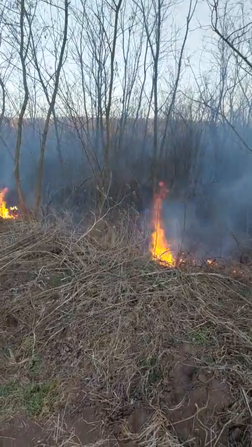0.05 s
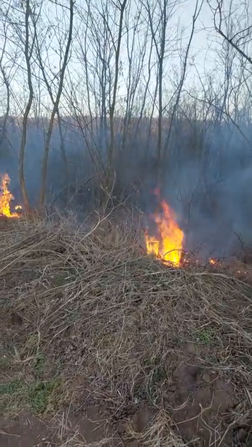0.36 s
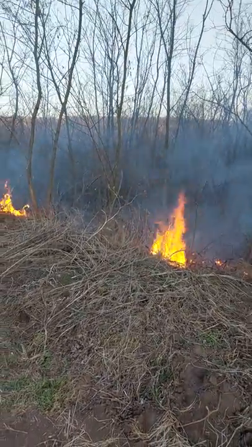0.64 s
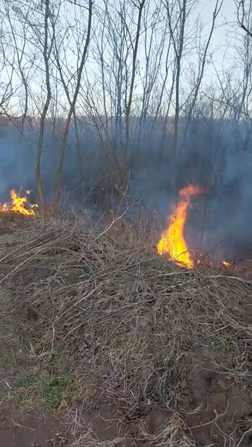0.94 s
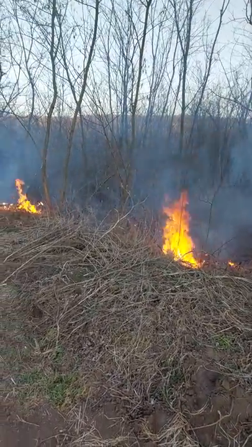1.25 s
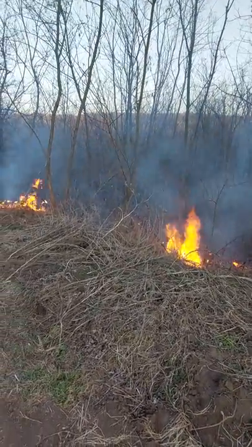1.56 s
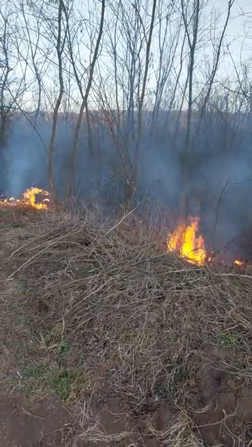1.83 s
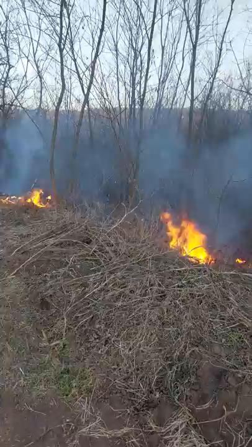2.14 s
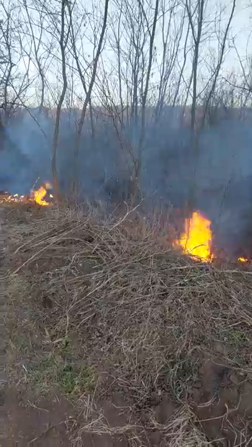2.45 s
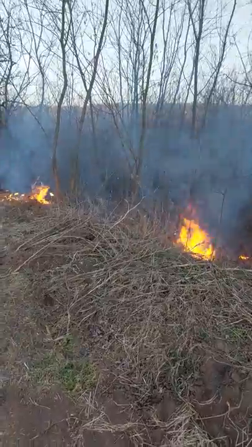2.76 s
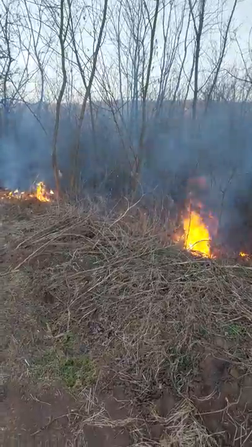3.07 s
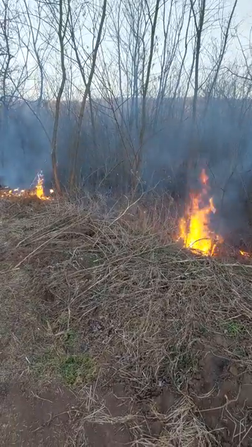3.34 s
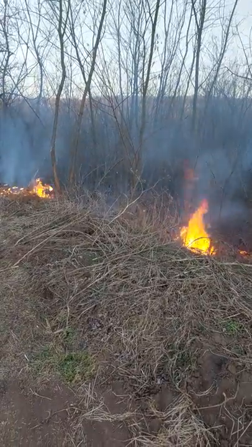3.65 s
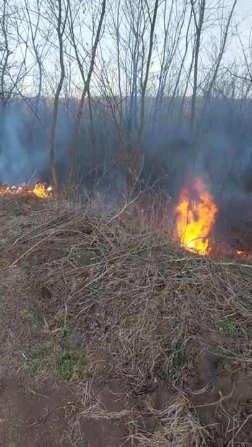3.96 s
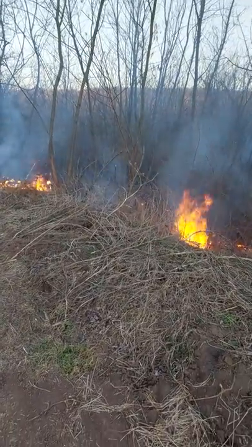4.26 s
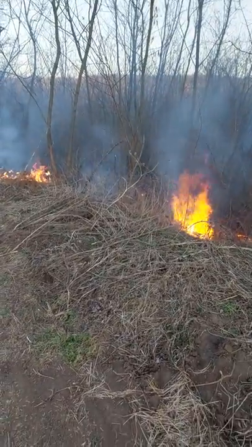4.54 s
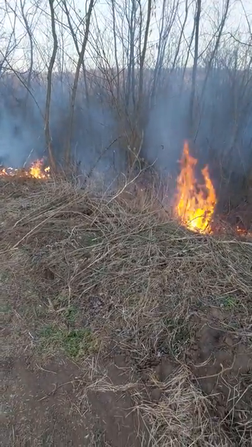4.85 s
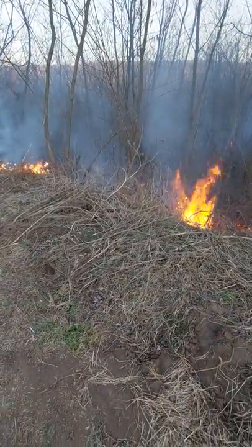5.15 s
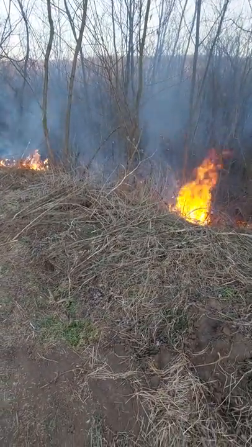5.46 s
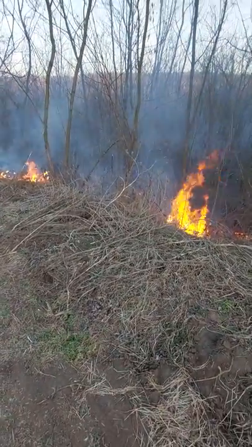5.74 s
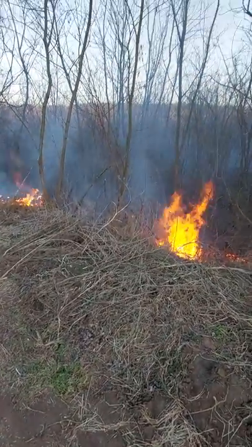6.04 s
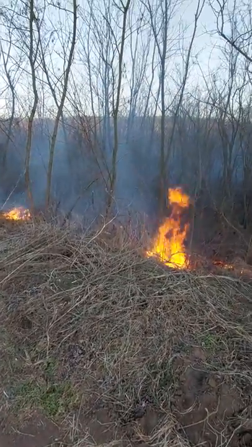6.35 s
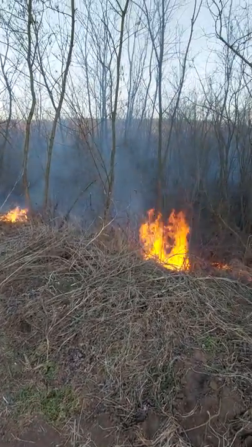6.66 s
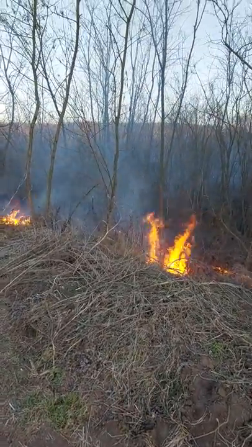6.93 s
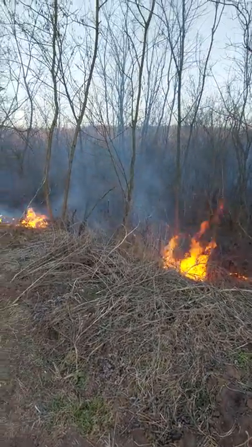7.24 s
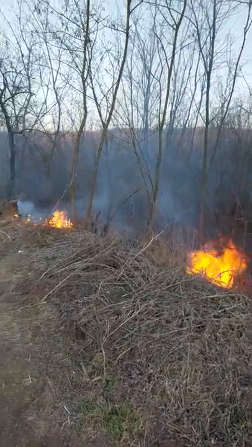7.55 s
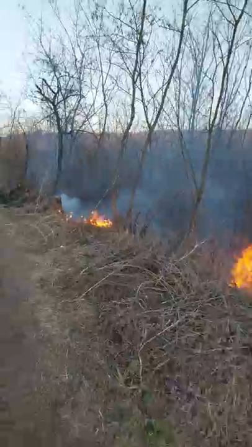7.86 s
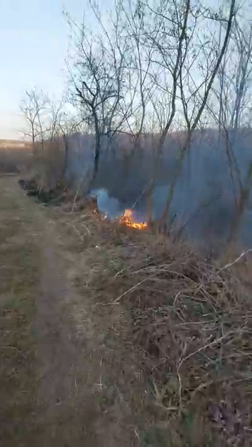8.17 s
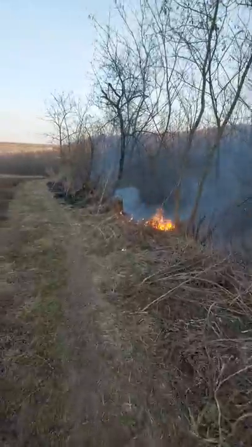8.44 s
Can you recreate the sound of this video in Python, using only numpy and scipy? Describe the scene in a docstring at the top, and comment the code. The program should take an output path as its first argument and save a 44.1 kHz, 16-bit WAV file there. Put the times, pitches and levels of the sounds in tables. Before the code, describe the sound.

Dry grass and brush burn at the edge of a wood. Sharp, irregular snaps of bursting stalks stand out from a fine, continuous crackle, while the flames rumble low and steady underneath. The snaps bunch up a little before the middle and again later, with faint short rushes as tufts catch. Past the middle, wind briefly thumps on the left side of the microphone.

```python
"""Sharp snaps over fine crackle and a low rumble: fire creeps through dry grass and brush by a wood.
Thick stalks burst and split, thin ones tick; brush and trunks scatter both. Countless tiny pops
form the bed, dry tufts flare in short rushes, and turbulent flames rumble. Steam whistles once
from a wet stem. For a moment, wind buffets the left microphone port."""
import sys
import numpy as np
from scipy import signal
from scipy.fft import rfft, irfft, next_fast_len
from scipy.io import wavfile
from scipy.ndimage import uniform_filter1d

SR = 44100
rng = np.random.default_rng(int(sys.argv[2]) if len(sys.argv) > 2 else 0)


def unload_audio(sound):
    """Save the sound as a 16-bit wav file, at the path given as the first command line argument."""
    columns = np.transpose(np.atleast_2d(sound))
    # keep every value between -1 and 1, then stretch to whole-number steps
    steps = np.round(np.clip(columns, -1, 1) * 32767)
    wavfile.write(sys.argv[1], SR, steps.astype(np.int16))


N = 383669
TIME = np.arange(N) / SR
LEFT_RIGHT = np.array([[1], [-1]])

# thick stalks bursting: t/s, level over 6 ms/dB, centre f/Hz, width/oct, woody knock/dB, L-R/dB
STALK_BURSTS = [(0.2427, -33.5, 10200, 1.95, -32, -1), (0.248, -36.5, 11900, 1.6, -30, 0.5),
                (0.3638, -40, 14600, 3, -3, -2), (0.449, -41.5, 9700, 2.8, -6, -2),
                (0.6722, -39.5, 7200, 1.9, 3, 1), (1.1084, -43, 1500, 6.6, -23, 0),
                (1.12, -30, 9500, 0.85, -17, 0), (1.283, -39, 14500, 1.2, -22, 0),
                (1.3892, -40.5, 8300, 4, -23, -1), (1.4551, -32.5, 3870, 2.2, -17, -1),
                (1.5944, -36.5, 11000, 1.7, -12, -1), (1.9228, -37.5, 14500, 2.3, -20, 0),
                (2.0196, -40.0, 6900, 4.4, -6, -2), (2.1478, -37.5, 14600, 2.7, -1, 0),
                (2.2208, -37, 14500, 1.2, -10, -1), (2.273, -41.5, 7500, 4.6, -16, -2),
                (2.6917, -32.5, 14600, 2.6, -2, -3), (2.6973, -42, 5600, 5.2, 0, 7),
                (2.739, -44, 4300, 2.3, -18, 1), (2.751, -38.5, 2270, 3.2, -24, 2),
                (2.886, -31, 14600, 1.6, -34, -3), (3.0286, -40, 8800, 2.4, -29, 1),
                (3.101, -41.5, 8150, 0.86, -7, -7), (3.2309, -38, 14600, 1.9, -30, -3),
                (3.3249, -32.5, 11400, 1.9, -5, -2), (3.355, -38.5, 6200, 4.1, 5, 1),
                (3.3696, -34, 8400, 2.7, -10, 0), (3.387, -37.5, 6100, 0.68, -6, -1),
                (3.4495, -35, 8000, 1.8, 1, -1), (3.547, -40.0, 4900, 3.4, 0, -2),
                (3.5556, -23.5, 14600, 3.1, -3, -1), (3.5837, -35, 7900, 2.5, -5, 2),
                (3.5948, -34.5, 9800, 3.3, -9, 1), (3.6144, -32.5, 8800, 3.1, -2, 2),
                (3.6323, -45, 10200, 3.7, 5, 0), (3.6751, -34.5, 3460, 3.3, 8, 0),
                (3.742, -44, 14500, 1.6, -11, -3), (4.098, -41.5, 4300, 1.8, 4, 0),
                (4.119, -34, 3650, 1.6, -6, -2), (4.151, -38, 14500, 2.3, -24, -3),
                (4.229, -37.5, 9200, 2.6, -30, 1), (4.5602, -37.5, 5600, 1.7, -2, -2),
                (4.5707, -45, 5200, 2.0, -3, 0), (4.6307, -44.5, 4500, 1.7, 4, -2),
                (4.6553, -34.5, 4300, 1.8, -2, 2), (4.8465, -39, 8000, 2.2, -17, -2),
                (4.887, -42, 14500, 1.9, -14, -3), (5.2938, -37.5, 10600, 1.5, -32, 1),
                (5.378, -34.5, 12500, 1.85, -30, 1), (5.4909, -35.5, 6500, 1.6, -30, 0),
                (5.6512, -41.5, 8500, 2.6, -24, 4), (5.6565, -34.5, 9200, 2.4, -9, 0),
                (5.6866, -37, 10800, 3.4, -20, 0), (5.8318, -27, 14600, 1.3, -24, 0),
                (6.0385, -31, 5170, 1.7, -10, 1.5), (6.0539, -39.0, 5000, 1.4, -3, -3),
                (6.0784, -42, 9400, 1.8, -5, -3), (6.1127, -43, 9000, 2.4, -10, 0),
                (6.1438, -38, 4300, 1.7, -19, -3.5), (6.2225, -35.5, 5670, 0.86, -9.5, -6),
                (6.338, -33.5, 7200, 1.5, -4.5, -6), (6.3778, -32.5, 6200, 1, -15, -3),
                (6.3853, -41.0, 5900, 1.5, -4, 1), (6.502, -36.0, 9400, 2.4, -13, -2),
                (6.557, -36.5, 5300, 1.2, -9.5, -1), (6.6259, -34.5, 7460, 1.7, -21, -2),
                (6.6537, -36.5, 7200, 1.8, -5.5, -1), (6.6936, -35.5, 14600, 3, -24, -4),
                (6.7885, -33.5, 14600, 2.1, -23, -5), (6.8, -42, 14200, 2.9, -20, -8),
                (6.816, -26.5, 14600, 2.3, -13, -3), (6.838, -29.5, 14600, 2.8, -11, -3),
                (6.982, -40.5, 8400, 1.4, -30, -7), (7.2201, -34.5, 8900, 1.8, -14, -1),
                (7.3405, -41, 6960, 1, -24, -4), (7.4064, -35.5, 7500, 2.0, -4, 0),
                (7.413, -34, 10300, 1.1, -19, 1), (7.423, -44, 14500, 0.99, -20, -3),
                (7.56, -37.5, 9800, 2.1, -24, 3), (7.6211, -39, 9440, 1.1, -30, -1),
                (7.951, -31.5, 4200, 3.5, 5, 0), (7.966, -37, 12600, 2.0, -30, 0),
                (8.4752, -36.5, 9300, 2.5, -16, 1)]
# burn intensity: t/s, grass base level/dB, brush base level/dB
BURN_LEVELS = [(0.0, -60, -65.5), (0.24, -57, -71), (0.58, -58, -62.5), (1.24, -57, -68.5),
               (1.55, -54, -60.5), (1.74, -56, -66.5), (2.57, -57, -64), (2.71, -55, -64),
               (3.05, -54, -67.5), (3.41, -52, -58), (3.51, -52, -59), (3.71, -54, -61.5), (3.9, -56, -65),
               (4.97, -55, -64), (5.19, -58, -77), (5.77, -54, -66), (6.27, -56, -61.5), (6.69, -55, -65),
               (7.39, -60, -69.5), (7.83, -57.5, -63), (8.43, -60, -71.5), (8.7, -54, -53.5)]
# tufts flaring: centre t/s, length/s, centre f/Hz, level/dB
TUFT_FLARES = [(0.18, 0.079, 13000, -55), (1.51, 0.053, 1700, -60), (1.517, 0.084, 9000, -61),
               (2.684, .06, 10000, -56), (2.7, 0.08, 1600, -59), (3.39, 0.064, 1600, -62),
               (3.603, 0.069, 1350, -52.5), (4.017, .14, 2600, -56), (5.06, 0.067, 6100, -57.5),
               (5.54, .06, 4540, -56), (6.18, 0.081, 2600, -61.5), (7.753, 0.067, 2000, -66),
               (7.994, 0.064, 6500, -56), (8.535, 0.11, 1800, -60), (8.546, 0.088, 8000, -58)]
# flame rumble: t/s, base level/dB
FLAME_LEVELS = [(0.0, -41), (0.9, -40), (1.8, -40), (3.6, -38.5), (4.9, -38), (5.3, -39.5), (6.7, -38.5),
                (7.4, -40.5), (7.95, -38.5), (8.25, -41.5), (8.7, -38.5)]
# eddies on the left port: centre t/s, length/s, level/dB
WIND_GUSTS = [(5.414, 0.056, -31), (5.592, 0.065, -31.5), (5.667, 0.04, -24.5), (5.794, 0.095, -33),
              (6.02, 0.061, -28), (6.124, 0.044, -29.5), (6.273, 0.044, -31.5), (6.41, 0.035, -24.5),
              (6.533, 0.095, -30.5), (6.604, 0.042, -21.5), (6.685, 0.03, -24)]
# source spectra: f/Hz, relative level/dB
GRASS_SPECTRUM = [(1500, -22), (3000, -10), (4700, -3), (5900, -3.5), (7400, 2.5), (9300, -5),
                  (10700, -2.5), (12000, 4), (13300, 1), (15500, 0)]
BRUSH_SPECTRUM = [(350, -16), (700, 8.5), (1000, -0.5), (1550, 3.5), (2400, -5.5), (3600, -8.5),
                  (6000, -17), (12000, -14.5)]
RUMBLE_SPECTRUM = [(18, -40), (26, -20), (36, -15), (50, -3.5), (70, -0.5), (130, 0), (175, -5.5),
                   (230, -3.5), (320, -12), (450, -25.5), (660, -25), (900, -34.5), (1500, -40.5),
                   (3000, -40)]
EDDY_SPECTRUM = [(18, -53), (40, -12), (70, 1), (130, 1), (230, -16.5), (400, -34), (900, -54), (2000, -76)]
# microphone port response: f/Hz, gain/dB
PORT_RESPONSE = [(700, 7), (1500, -0.6), (2400, 1.6), (3500, 2.4), (4800, 2.6), (6000, -1.2), (7400, 1.9),
                 (9500, -2.5), (12000, 3), (15500, 1)]
# rumble stereo width: f/Hz, side re mid/dB
RUMBLE_WIDTH = [(25, -7.5), (40, -14), (80, -17), (200, -18), (330, -16.5), (480, -2), (680, -17.5),
                (1200, -1)]
# rumble balance: f/Hz, left gain/dB (negated on the right)
RUMBLE_BALANCE = [(28, 0.3), (70, -0.86), (140, -0.22), (230, -1.7), (380, -1.5), (500, 0.43), (700, 2.5),
                  (1200, 1.1)]


def snaps(crack_share=0.57, at_db=-36, share_per_db=0.03):
    """Thick stalks burst: loud ones crack cleanly, weak ones crunch."""
    t_s, db, hz, octaves, knock_db, pan_db = np.transpose(STALK_BURSTS)
    crack = crack_share + share_per_db * (db - at_db)
    return bursts(t_s, db - 0.2, hz, octaves, knock_db, crack, pan_db)


def splits(max_delay_s=0.024, drop_db=15.5, base_cap_db=-47, spread_db=10):
    """Each thick stalk tears a little further just after bursting, in the same band."""
    t_s, db, hz, octaves, knock_db, pan_db = np.transpose(STALK_BURSTS)
    wait, strength, crack = rng.random((len(t_s), 3)).T
    db = np.minimum(db - drop_db, base_cap_db) + spread_db * (strength - 0.5)
    return bursts(t_s + max_delay_s * np.sqrt(wait), db, hz, octaves, knock_db, crack / 2, pan_db)


def ticks(grass_db, over_grass_db=1, spread_db=14.5, rarity=2.7, count=520):
    """Thin stalks tick, louder and denser where the grass burns harder; a few stand out."""
    jitter, strength, pitch, width, knock, crack, side = rng.random((count, 7)).T
    odds = np.cumsum(undb(0.8 * grass_db))
    t_s = np.interp((np.arange(count) + jitter) / count, odds / odds[-1], TIME)
    db = np.interp(t_s, TIME, grass_db) + over_grass_db + spread_db * strength ** rarity
    return bursts(t_s, db, hz=15500 * 2 ** (-1.4 * pitch ** 2), octaves=1 + 2 * width,
                  knock_db=-30 + 20 * knock, crack=0.073 + 0.5 * crack, pan_db=6 * (side - 0.5) - 1.4)


def bursts(t_s, db, hz, octaves, knock_db, crack, pan_db, size=1024):
    """Stalk bursts at the ports: pressure spike (energy share `crack`), splintering, straw rustle."""
    lead = size // 16
    t = np.arange(size) / SR
    f = np.fft.rfftfreq(size, 1 / SR) + 1
    db, hz, octaves, knock_db, crack, pan_db = (
        column[:, None, None] for column in (db, hz, octaves, knock_db, np.clip(crack, 0, 1), pan_db))
    direction, height = rng.standard_normal((len(t_s), 2)).T[:, :, None, None]
    band = np.sqrt(hump(f, hz, octaves) + undb(2 * knock_db) * hump(f, 1640, 0.72))
    bounce_s = 0.00035 * 2 ** (0.5 * height)  # a short echo off the ground
    resonance = 1 / (1 + 0.22 * np.exp(-2j * np.pi * f * bounce_s))
    # the split takes time to run: treble leaves first
    chirp = np.exp(-2j * np.pi * 0.0005 * 6000 * (1 - np.exp(-f / 6000)))
    # one port hears it first: phases part toward the treble
    apart = np.minimum(f / 4500, 1)
    arrival = np.exp(-2j * np.pi * f * lead / SR + 0.85j * np.sign(direction) * apart * LEFT_RIGHT)
    fade = np.exp(-t / 0.0013) + undb(-8) * np.exp(-t / 0.0048)  # splintering + rustle
    noise = rfft(rng.standard_normal((len(t_s), 2, size)) * fade) / np.sqrt(np.sum(fade ** 2))
    splinters = (noise[:, :1] + apart * noise[:, 1:] * LEFT_RIGHT) / np.sqrt(1 + apart ** 2)
    excitation = np.sqrt(crack) + np.sqrt(1 - crack) * splinters
    waves = irfft(band * resonance * chirp * arrival * excitation, size) * undb(pan_db * LEFT_RIGHT / 2)
    energy = np.sum(waves ** 2, axis=2, keepdims=True).mean(axis=1, keepdims=True)
    waves *= undb(db) * np.sqrt(0.006 * SR / energy)
    out = np.zeros((2, N + 2 * size))
    for start, wave in zip(np.clip(t_s * SR, 0, N).astype(int), waves):
        out[:, start:start + size] += wave
    return colour(out[:, lead:lead + N], PORT_RESPONSE)


def wood_scatter(x, body_t60_s, treble_t60_s, wet_db):
    """Brush and trunks return a thin, grainy scatter; treble dies first."""
    t = np.arange(SR // 2) / SR
    attack = np.minimum(t / 0.00043, 1)
    grains = rng.standard_normal((2, len(t))) * undb(rng.standard_normal(len(t))) * attack
    body = colour(grains * undb(-60 * t / body_t60_s),
                  [(900, -6), (1800, -1), (3000, -0.5), (5000, -6), (9000, -33), (15000, -30)])
    treble = colour(grains * undb(-60 * t / treble_t60_s), [(2500, -4), (7000, 12), (15000, 12.5)])
    mid, side = body + treble
    echo = mid + colour(side, [(500, 4.2), (3000, 3)]) * LEFT_RIGHT
    echo /= np.sqrt(np.sum(echo ** 2) / 2)
    return undb(wet_db) * signal.oaconvolve(x, echo, axes=1)[:, :N]


def crackle(spectrum, pops_per_s, spread_db, width, flicker_db, patches=4, ring_s=0.00052):
    """Tiny pops from patches along the fire line, each patch with its own ring and flicker."""
    t = np.arange(SR // 200) / SR
    out = 0
    for _ in range(patches):
        hits = np.flatnonzero(rng.random(N) < pops_per_s / patches / SR)
        strength = np.minimum(rng.standard_exponential(N)[hits], 3.5)
        db = spread_db * strength + flicker_db * walk(22)[hits]
        pops = np.zeros(N)
        pops[hits] = undb(db) * (-1) ** np.arange(len(hits))
        mid, side = rng.standard_normal((2, len(t))) * np.exp(-t / ring_s)
        ring = unit_rms(mid + width * side * LEFT_RIGHT)
        out = out + signal.oaconvolve(pops[None], ring, axes=1)[:, :N]
    return unit_rms(colour(out, spectrum))


def flares(sputter_db=4):
    """Dry tufts catch all at once, each in a short, sputtering rush."""
    out, sputter = np.zeros((2, N)), walk(300)
    for t_s, length_s, hz, db in TUFT_FLARES:
        burning = np.abs(TIME - t_s) < 2 * length_s
        band = [(hz / 2, -16), (hz * 0.51, -2), (hz, 0), (hz * 1.3, -4), (hz * 2, -13), (hz * 4, -30)]
        mid, side = colour(rng.standard_normal((2, N))[:, burning], band)
        rush = unit_rms(mid + 0.5 * side * LEFT_RIGHT)
        swell = np.exp(-2 * ((TIME[burning] - t_s) / length_s) ** 2)
        out[:, burning] += rush * undb(db + sputter_db * sputter[burning]) * swell
    return out


def steam_whistle(start_s=1.622, start_hz=5400, sag_hz=210, sag_s=0.026, fundamental_db=-45.5):
    """Steam sings through a split wet stem; pitch sinks with the pressure, the octave fades first."""
    corners_s = np.cumsum([0, 0.016, 0.035, 0.035])  # attack, hold, release
    age_s = np.clip(TIME - start_s, 0, corners_s[-1])
    envelope = np.interp(age_s, corners_s, [0, 1, 1, 0])
    hz = start_hz - sag_hz * (1 - np.exp(-age_s / sag_s))
    waver = 1 + 0.0052 * walk(250)
    phase = 2 * np.pi * np.cumsum(hz * waver) / SR + LEFT_RIGHT
    octave = undb(10) * np.exp(-age_s / 0.018) * np.sin(2 * phase)
    return undb(fundamental_db) * envelope * (np.sin(phase) + octave)


def flames(flicker_db=1.43):
    """Turbulent burning rumbles, nearly alike at both ports."""
    rumble_db, = curves(FLAME_LEVELS)
    mid, side = colour(rng.standard_normal((2, N)), RUMBLE_SPECTRUM)
    left, right = mid + colour(side, RUMBLE_WIDTH) * LEFT_RIGHT
    left = colour(left, RUMBLE_BALANCE)
    right = colour(right, [(hz, -db) for hz, db in RUMBLE_BALANCE])
    return unit_rms(np.array([left, right])) * undb(rumble_db + flicker_db * walk(14) - 0.72)


def wind(right_db=-17):
    """Eddies thump on the left port, barely reaching the right."""
    power = sum(undb(2 * db) * np.exp(-(2 * (TIME - t_s) / length_s) ** 2)
                for t_s, length_s, db in WIND_GUSTS)
    churn = colour(rng.standard_normal((2, N)), EDDY_SPECTRUM)
    churn /= np.sqrt(uniform_filter1d(churn ** 2, size=SR // 20, axis=1))  # levelled over 50 ms
    return churn * np.sqrt(power + 1e-18) * undb([[0], [right_db]])


def undb(db):
    """Decibels to gain."""
    return 10 ** (np.asarray(db) / 20)


def unit_rms(x):
    """Scale to rms 1."""
    return x / np.sqrt(np.mean(x ** 2) + 1e-20)


def curves(rows):
    """Table columns, linearly interpolated over time."""
    t_s, *columns = np.transpose(rows)
    return [np.interp(TIME, t_s, column) for column in columns]


def colour(x, points):
    """Filter by (f/Hz, gain/dB) points."""
    size = next_fast_len(x.shape[-1], True)
    hz, db = np.transpose(points)
    f = np.fft.rfftfreq(size, 1 / SR) + 1
    gain = undb(np.interp(np.log(f), np.log(hz), db))
    return irfft(rfft(x, size) * gain, size)[..., :x.shape[-1]]


def hump(f, hz, octaves):
    """Power response of a rounded band around hz."""
    return 1 / (1 + (2 * np.log2(f / hz) / octaves) ** 4)


def walk(rate_hz):
    """Random steps, smoothed twice; rms 1."""
    hold = int(SR / rate_hz)
    steps = np.repeat(rng.standard_normal(N // hold + 1), hold)
    return unit_rms(uniform_filter1d(uniform_filter1d(steps, hold), hold)[:N])


def scene():
    """Stalks and their scatter, crackle bed, flares, whistle, flames, wind."""
    grass_db, brush_db = curves(BURN_LEVELS)
    stalks = snaps() + splits() + ticks(grass_db)
    grass = crackle(GRASS_SPECTRUM, pops_per_s=3000, spread_db=3.5, width=1.22, flicker_db=6)
    grass *= undb(grass_db + 1.8 - 0.5 * LEFT_RIGHT)
    brush = crackle(BRUSH_SPECTRUM, pops_per_s=2000, spread_db=4.5, width=0.52, flicker_db=3.5)
    brush *= undb(brush_db + 2.5)
    scatter = wood_scatter(stalks, body_t60_s=0.29, treble_t60_s=0.039, wet_db=-8.5)
    return stalks + scatter + grass + brush + flares() + steam_whistle() + flames() + wind()


def record(dry):
    """Phone low-pass at 15.9 kHz."""
    return signal.sosfiltfilt(signal.ellip(8, 0.1, 50, 15900, fs=SR, output="sos"), dry)


dry = scene()
out = record(dry)
unload_audio(out)
```